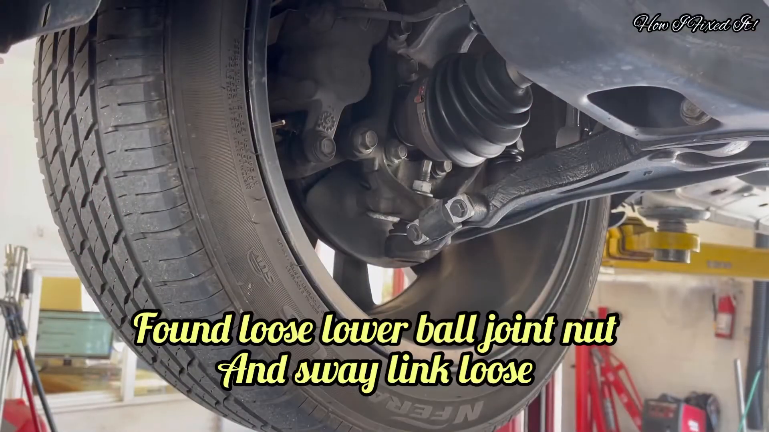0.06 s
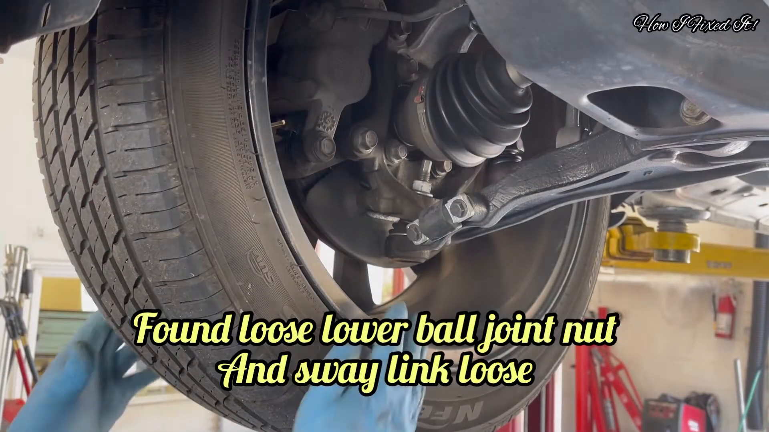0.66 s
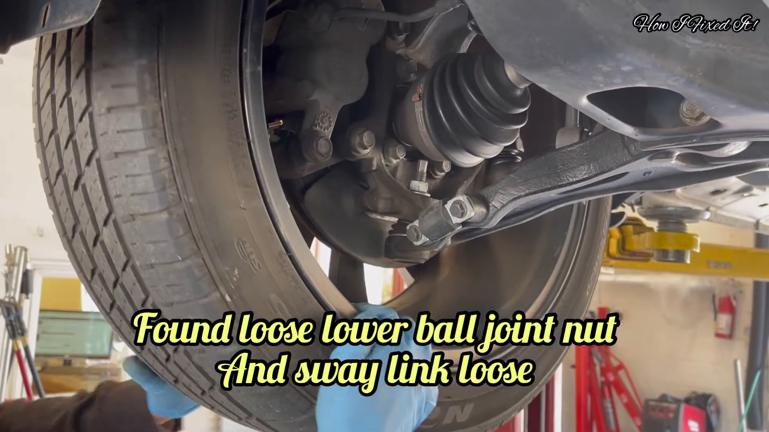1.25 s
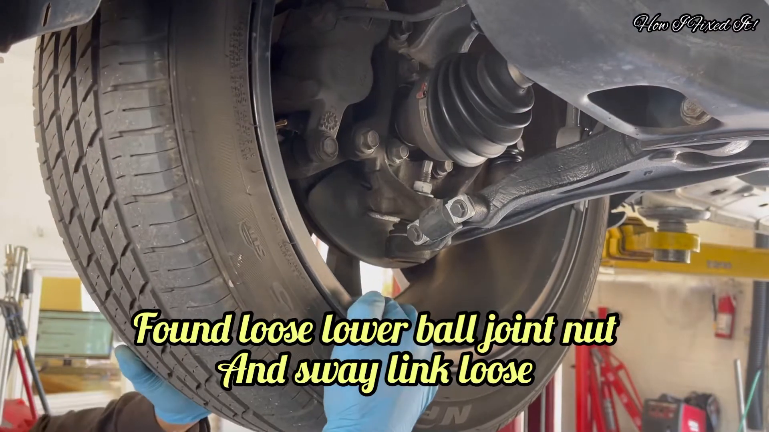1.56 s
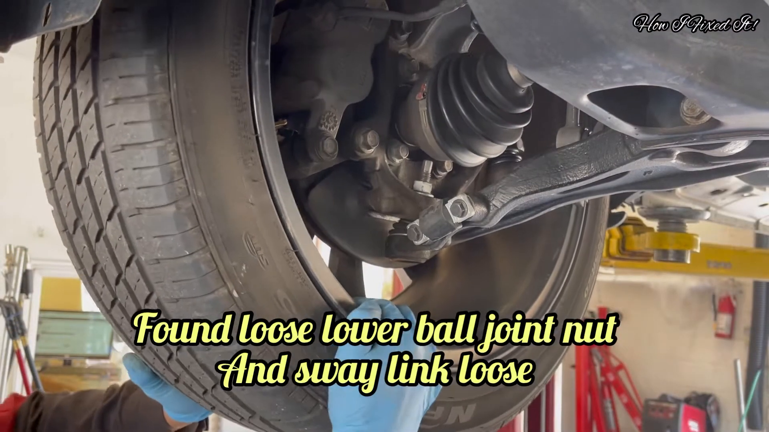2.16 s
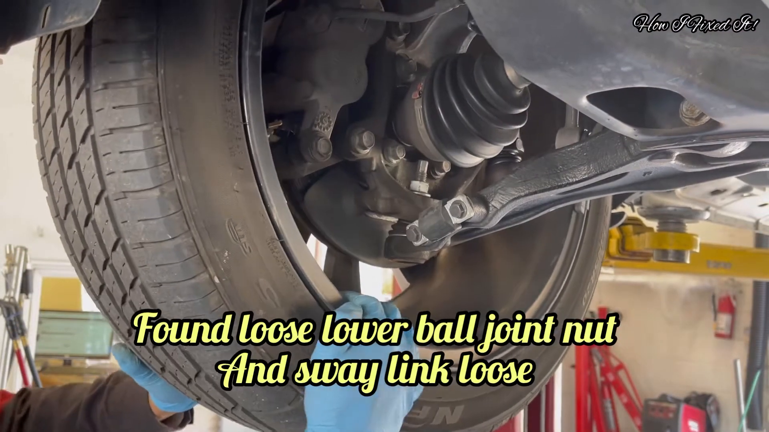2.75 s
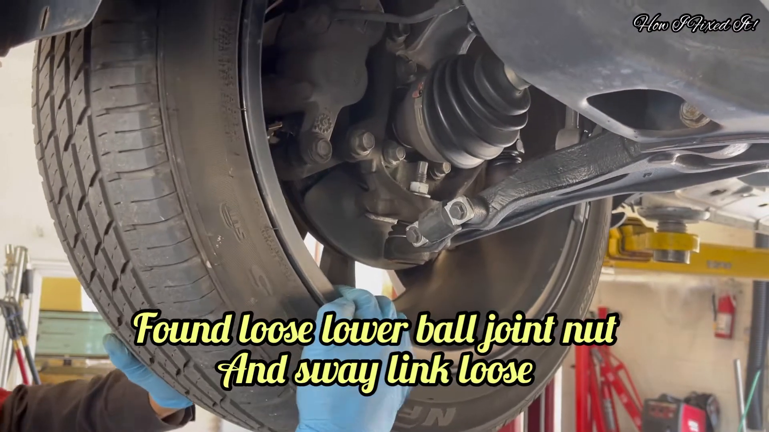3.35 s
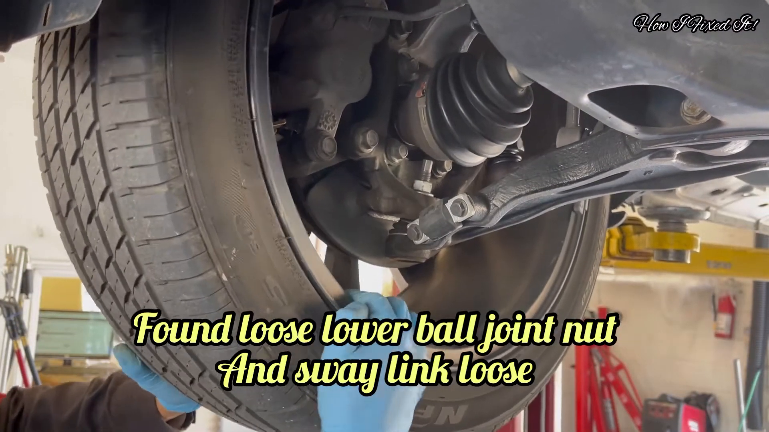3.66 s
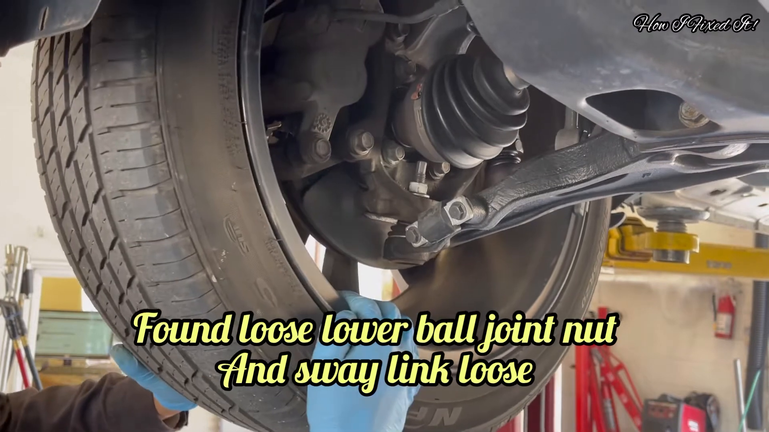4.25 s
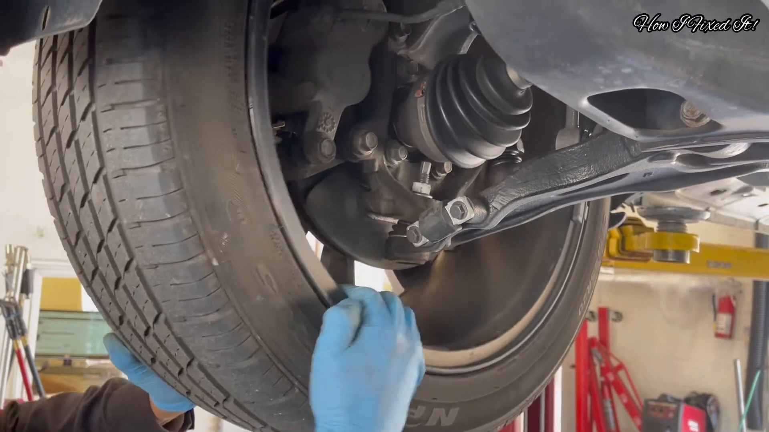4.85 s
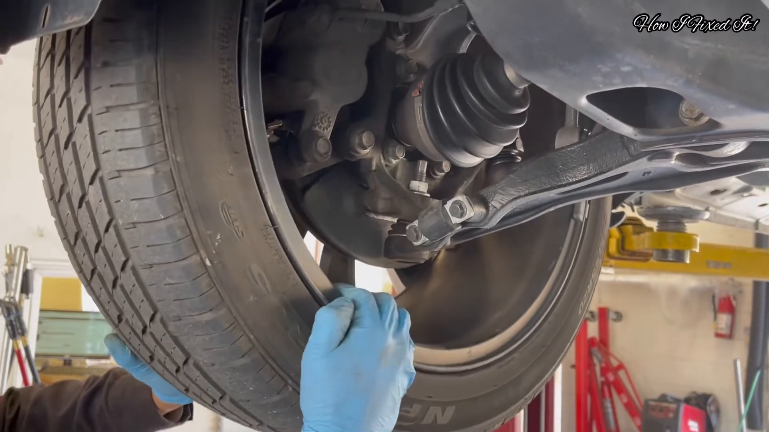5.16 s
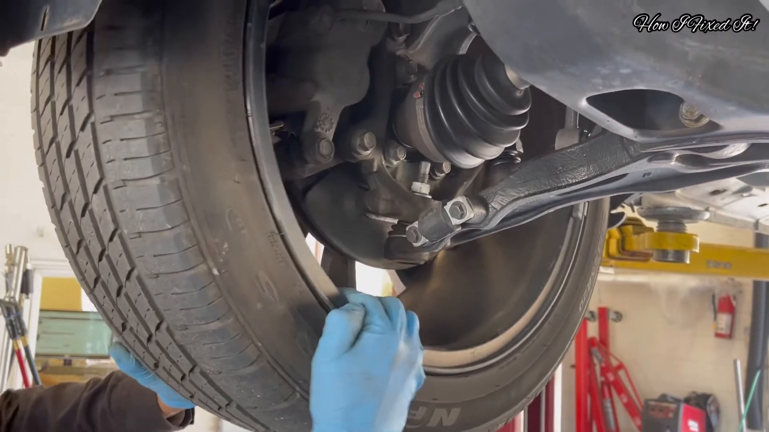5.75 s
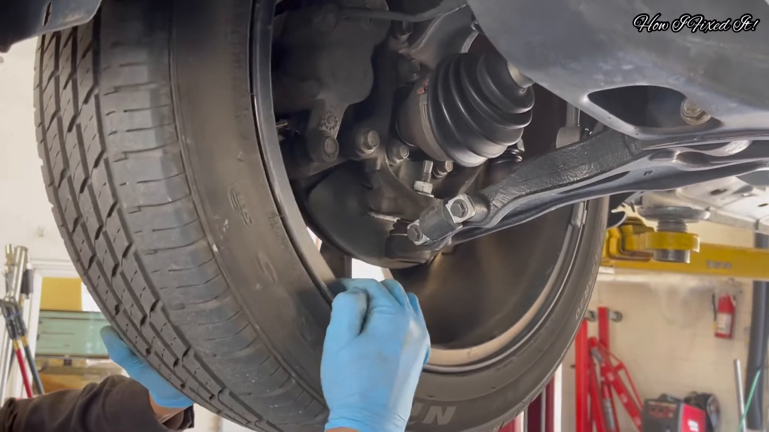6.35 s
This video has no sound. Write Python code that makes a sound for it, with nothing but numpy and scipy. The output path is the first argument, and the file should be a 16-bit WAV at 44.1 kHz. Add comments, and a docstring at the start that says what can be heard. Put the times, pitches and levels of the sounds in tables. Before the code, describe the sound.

A low workshop rumble runs throughout, with a distant engine droning at a slightly wandering pitch, swelling and fading. In the first 0.7 seconds there are a few faint, thin, high squeaks. Gloves slide softly over a car tyre, with a brief swish around 0.7 seconds and lighter brushing until about 1.6. At about 1.7 seconds the wheel starts being rocked, and a loose ball joint knocks close to the microphone: short, thudding clunks with a slight metallic ring, coming in uneven clusters, several a second. From 2.4 to 5.3 seconds a loose suspension link adds sharper clacks with a brief bright ping, roughly every half second, slightly to the left. Soft glove rubbing, light ticks and a low wheel rumble accompany the rocking, with another small swish near 3.5 seconds. The knocking continues until the end, at about 6.4 seconds.

```python
"""Rocking a loose front wheel

A car is up on a workshop lift, and gloved hands rock a front wheel back and forth. The gloves rub,
slide and tick on the tyre, with a few faint squeaks early on. The loose ball joint knocks in the
steering knuckle and the loose sway link clicks against its bracket. Behind them an engine drones
at a slowly wandering speed over the rumble of the shop."""
import sys
import numpy as np
from scipy import signal
from scipy.fft import rfft, irfft, next_fast_len
from scipy.io import wavfile

SR = 44100
rng = np.random.default_rng(int(sys.argv[2]) if len(sys.argv) > 2 else 0)


def generate_wav(signal):
    """Clip the signal to [-1, 1] and save it as 16-bit WAV at the path in sys.argv[1]."""
    frames = np.transpose(np.atleast_2d(signal))
    scaled = np.clip(frames, -1, 1) * 32767
    pcm = np.round(scaled).astype(np.int16)
    wavfile.write(sys.argv[1], SR, pcm)


N = 282681
BANDS_HZ = np.geomspace(25, 12800, 25)


def from_db(db):
    """Decibels to gain."""
    return 10 ** (np.asarray(db) / 20)


def automation(rows):
    """Draw each column of a timed table as a curve, one value a sample."""
    times, *columns = np.transpose(rows)
    return [np.interp(np.arange(N) / SR, times, column) for column in columns]


def at_hz(points, hz):
    """Read a spectrum on a log-frequency axis."""
    point_hz, values = np.transpose(points)
    return np.interp(np.log(hz), np.log(point_hz), values)


def drift(rate):
    """Random modulation with a spread of about 1, taking `rate` new values a second."""
    knots = rng.standard_normal(20000)
    return np.interp(np.arange(N) / SR * rate, np.arange(len(knots)), knots)


def swell(time, hold_s, db, rise_db_per_s, fall_db_per_s):
    """Envelope in dB that peaks at `time`, holds and fades."""
    t = np.arange(N) / SR
    return db - rise_db_per_s * np.maximum(time - t, 0) - fall_db_per_s * np.maximum(t - time - hold_s, 0)


def band_gains(spectrum):
    """Band EQ with this spectrum at unit power, rolling off 30 dB an octave past its ends."""
    octaves_outside = np.abs(np.log2(BANDS_HZ / np.clip(BANDS_HZ, spectrum[0][0], spectrum[-1][0])))
    gains = from_db(at_hz(spectrum, BANDS_HZ) - 30 * octaves_outside)
    widths = BANDS_HZ * np.log(BANDS_HZ[1] / BANDS_HZ[0])
    return gains / np.sqrt(np.sum(gains ** 2 * widths) * 4 / SR)


def stereo_noise(energy, image):
    """Play band energies on noise; the image's correlation sets each band's mid/side mix."""
    half_band = np.sqrt(BANDS_HZ[1] / BANDS_HZ[0])
    white = rng.standard_normal((2, 2, N))
    out = np.zeros((2, N))
    for k, hz in enumerate(BANDS_HZ):
        bandpass = signal.butter(2, [hz / half_band, hz * half_band], "band", fs=SR, output="sos")
        mid, side = signal.sosfilt(bandpass, white[k % 2])
        correlation = np.clip(at_hz(image, hz), -1, 1)
        band = np.sqrt(1 + correlation) * mid + np.sqrt(1 - correlation) * side * [[1], [-1]]
        out += np.sqrt(energy[k]) * band
    return out


def bed(spectrum, level_db, flutter_db, rate):
    """Band energies of a sustained noise whose level flutters."""
    envelope = from_db(level_db + flutter_db * drift(rate))
    return np.outer(band_gains(spectrum) ** 2, envelope ** 2)


def impulses(times, sizes, lengths_s):
    """One push per contact, spread over its length."""
    out = np.full(N + SR, 1e-18)
    for time, size, length_s in np.broadcast(times, sizes, lengths_s):
        start, count = max(round(time * SR), 0), max(round(length_s * SR), 1)
        out[start:start + count] += size / count
    return out[:N]


def decay(energy, t60):
    """Stored energy falls 60 dB in t60 seconds."""
    return signal.lfilter([1], [1, -np.exp(-np.log(1e6) / (t60 * SR))], energy)


def dense_modes(times, hit_db, spectrum, t60, damping, attack_s, room_db, room_t60, contact_s=0):
    """Band energies of many close modes: they build up, die sooner in the treble and leave a room tail."""
    out, smoothing = [], np.exp(-1 / (attack_s * SR))
    for hz, gain in zip(BANDS_HZ, band_gains(spectrum)):
        blows = impulses(times, (gain * from_db(hit_db(hz))) ** 2, contact_s)
        direct = decay(blows, t60 * (1000 / hz) ** damping)
        tail = from_db(room_db) ** 2 * decay(blows, room_t60)
        out.append(signal.lfilter([1 - smoothing], [1, -smoothing], direct + tail))
    return np.array(out)


def ringing(times, hit_db, modes, scatter_db, slack_rad, width_rad, left_lead_rad):
    """Each contact strikes every mode with its own strength; a slack contact scatters their phases."""
    out, age = np.zeros((2, N + SR)), np.arange(SR // 4) / SR
    hz, level_db, t60 = np.transpose(modes)
    strike_db = np.array([hit_db(f) for f in hz]).T + level_db
    attack = 1 - np.exp(-age / .001)
    rings = np.exp(np.outer(2j * np.pi * hz - np.log(1000) / t60, age)) * attack
    # each mode reaches left and right at its own phase
    turn = np.exp(.5j * (left_lead_rad + width_rad * rng.normal(size=len(hz))))
    for time, mode_db in zip(times, strike_db):
        strength, phase = rng.normal(size=(2, len(hz)))
        strike = from_db(mode_db + scatter_db * strength) * np.exp(1j * slack_rad * phase)
        start = max(round(time * SR), 0)
        out[:, start:start + len(age)] += (np.array([strike * turn, strike / turn]) @ rings).imag
    return out[:, :N]


def spectral_pan(x, balance):
    """Shift the left/right balance by frequency."""
    size = next_fast_len(N + SR // 10)
    hz = np.maximum(np.arange(size // 2 + 1) * SR / size, 1)
    gains = from_db(at_hz(balance, hz) * np.array([[.5], [-.5]]))
    return irfft(rfft(x, size) * gains, size)[:, :N]


# how hard the hands work the wheel, for rumble, rub and hiss: (time [s], level re steady rocking [dB])
EFFORT = [(0, -5.5), (1.62, -5.5), (2.1, -1), (2.6, 1), (3.1, 0.5), (3.4, 2), (4.1, -1.5), (4.6, -2),
          (5.2, 0.5), (6.41, 0.5)]
# low end of the rocking wheel: (frequency [Hz], density [dB])
WHEEL_RUMBLE = [(22, -16.5), (33, -7), (45, -6.5), (56, 10), (75, 8), (110, -11), (160, -3), (220, -30.5),
                (400, -42)]
# room tone of the shop: (frequency [Hz], density [dB])
ROOM_TONE = [(25, -6), (40, -6.5), (60, 5), (85, 17), (120, 19.5), (160, 14), (215, 4.5), (420, -9),
             (720, -5.5), (1300, -15), (2300, -24), (5000, -30), (8400, -33.5), (11500, -44)]
# stereo image of the shop and the hands: (frequency [Hz], correlation [-1..1])
SHOP_IMAGE = [(60, 1), (130, 0.79), (280, 0.78), (590, 0.087), (1260, 0.13), (2710, 0.43), (5800, 0.52),
              (8500, 0.94), (12000, 1)]
def workshop():
    """The rocking wheel rumbles over the steady air of the shop."""
    effort_db, = automation(EFFORT)
    rumble = bed(WHEEL_RUMBLE, -36 + 0.89 * effort_db, flutter_db=3, rate=10)
    air = bed(ROOM_TONE, -35, flutter_db=1.1, rate=3.65)
    return stereo_noise(rumble + air, SHOP_IMAGE)


# the engine's main note, following its speed: (time [s], pitch [Hz], level [dB])
ENGINE_NOTE = [(0, 124.6, -27), (0.8, 125.8, -36), (1.7, 123.4, -36.5), (2.3, 130.3, -36.5),
               (2.52, 131.4, -30), (2.75, 129.7, -25), (3.42, 127, -24.5), (3.68, 120.6, -33.5),
               (4.15, 122.2, -25.5), (4.52, 122.6, -27), (4.85, 121.6, -38.5), (5.25, 120.6, -27),
               (5.95, 121.1, -32.5), (6.41, 122.2, -37)]
# engine order an octave below that note: (time [s], level [dB])
HALF_ORDER = [(0, -43), (1.7, -41), (2.2, -36.5), (3.3, -34.5), (3.7, -44), (4.15, -43), (4.8, -35),
              (5.6, -40.5), (6.41, -61)]
# engine order at three quarters of its pitch: (time [s], level [dB])
THREE_QUARTER_ORDER = [(0, -31), (1.2, -39.5), (3.2, -40), (4.0, -58), (6.41, -55)]
# a second, weaker hum: (time [s], pitch [Hz], level [dB])
SIDE_HUM = [(0, 142.5, -79), (0.3, 139.7, -37), (1.5, 148.4, -38.5), (2.12, 148.9, -30), (2.45, 154, -56),
            (3.7, 159.9, -38), (4.6, 160.7, -38.5), (5.0, 159.8, -48)]
def engine():
    """Only the engine's low orders carry across the shop, wavering on the way; a hum sits beside them."""
    hz, main_db = automation(ENGINE_NOTE)
    half_db, = automation(HALF_ORDER)
    three_quarter_db, = automation(THREE_QUARTER_ORDER)
    hum_hz, hum_db = automation(SIDE_HUM)
    phase = 2 * np.pi * np.cumsum(hz) / SR
    waver_db, waver_rad = 1.3 * drift(rate=12), .3 * drift(rate=12)
    drone = from_db(main_db + waver_db) * np.sin(phase + waver_rad)
    drone += from_db(half_db) * np.sin(phase / 2 + 0.13 * drift(rate=11))
    drone += from_db(three_quarter_db) * np.sin(phase * 3 / 4)
    hum = from_db(hum_db) * np.sin(2 * np.pi * np.cumsum(hum_hz) / SR)
    return np.sqrt(2) * (drone + hum) * from_db([[.25], [-.25]])


# body of the gloves rubbing on the tyre: (frequency [Hz], density [dB])
RUB_TONE = [(110, -18), (180, -3), (246, 4), (269, -5.5), (377, -4.5), (515, -7), (579, -9), (626, -19.5),
            (750, -6), (4000, -33), (5200, -54.5), (8800, -120)]
# hiss on top of the rub: (frequency [Hz], density [dB])
HISS_TONE = [(1500, -10), (2500, -2.5), (2900, -13), (5500, -0.5), (7600, -23.5), (9500, -7.5),
             (11000, -17), (12000, -37)]
# light ticks of glove and rubber: (time [s], level [dB])
TICKS = [(0.283, -55.5), (1.983, -56), (2.033, -53), (2.199, -58), (2.937, -58), (5.859, -55.5),
         (6.225, -59.5)]
# colour of a tick: (frequency [Hz], density [dB])
TICK_TONE = [(1500, -22), (4000, 7), (6000, -2), (8300, 6.5), (10000, 1), (12000, -21)]
# a glove slides on the tread: (peak time [s], level [dB], swell [dB/s], fade [dB/s])
SLIDES = [(0.43, -68, 40, 60), (0.705, -53.5, 550, 200), (0.745, -50, 400, 190), (0.905, -62, 150, 150),
          (1.26, -63.5, 38, 100), (1.56, -62, 80, 48), (3.425, -55.5, 92, 220), (3.548, -58, 450, 165)]
# bright swish of a slide: (frequency [Hz], density [dB])
SLIDE_TONE = [(2500, -2), (4500, 0), (7000, -4), (9000, -0.5), (11300, 10.5), (12600, -9.5)]
def hands():
    """Gloves tick, rub and slide on the tyre; the rub and its hiss ride the effort."""
    effort_db, = automation(EFFORT)
    tick_times, tick_db = np.transpose(TICKS)
    ticks = dense_modes(tick_times, lambda hz: tick_db + 7, TICK_TONE, t60=0.06, damping=0.068,
                        attack_s=0.0015, room_db=-12.5, room_t60=0.36)
    rub = bed(RUB_TONE, -40 + effort_db, flutter_db=1.3, rate=37)
    hiss = bed(HISS_TONE, -63.5 + 0.99 * effort_db, flutter_db=3.5, rate=42)
    slide_db = np.max([swell(time, 0, db, rise, fall) for time, db, rise, fall in SLIDES], axis=0)
    slides = bed(SLIDE_TONE, slide_db, flutter_db=1.2, rate=190)
    return stereo_noise(ticks + rub + hiss + slides, SHOP_IMAGE)


# faint, high squeaks: (time [s], hold [s], level [dB], flutter [dB])
SQUEAKS = [(0, .04, -68, -2), (.233, 0.013, -63, -2), (.318, .035, -61, 3), (0.365, 0.015, -58, 3.5),
           (0.547, 0.14, -67, 5.5), (0.574, 0.046, -61.5, 6.5)]
def squeaks():
    """A thin whistle in short bursts, smooth at first, then stuttering."""
    pitch_hz, wobble_hz, fade_db_per_s = 5600, 45, 500
    flutter = drift(rate=128.4)
    bursts_db = [swell(time, hold_s, db, fade_db_per_s, fade_db_per_s) + flutter_db * flutter
                 for time, hold_s, db, flutter_db in SQUEAKS]
    envelope = from_db(np.max(bursts_db, axis=0))
    phase = 2 * np.pi * np.cumsum(pitch_hz + wobble_hz * drift(rate=300)) / SR
    return np.sqrt(2) * envelope * np.sin(phase + np.array([[.3], [-.3]]))


# ball joint hits; thud, clank, crack and snap are trims on the level:
# (time [s], level [dB], thud [dB], clank [dB], crack [dB], snap [dB], contact length [s])
KNOCKS = [(1.7238, -34, -4.5, -15, -38, 10, 0.00207), (1.765, -24, -2, -4, -28.5, 3, 0.0021),
          (1.904, -39, 4.5, -4, -28, -2, 0.0025), (1.937, -36.5, -0.5, -2, -19.5, 4, 0.0065),
          (1.963, -28.5, 0, -10.5, -33, 6, .002), (1.972, -30, 0.5, -10, -37, 6, 0.0039),
          (2.003, -40, 2, -8, -25, 2, 0.0041), (2.233, -31, 2, -7, -33.5, 3, 0.00406),
          (2.438, -27.5, 1.5, -7, -29.5, -0.5, 0.0019), (2.842, -21.5, -13.5, -17.5, -43, -2, .002),
          (2.91, -29.5, 2, -13, -29, -5, 0.0063), (3.316, -19.5, -13.5, -10.5, -49, -2, 0.00199),
          (3.384, -36, 6.5, -10, -19, -10, 0.007), (3.779, -26.5, -9.5, -13.5, -49, -6, 0.00297),
          (3.87, -26, -2.5, -10, -39, -4, 0.0028), (4.153, -35, -0.5, -12.5, -37, 7.5, 0.0022),
          (4.27, -27.5, -10, -15, -48, 0.5, 0.00198), (4.324, -39.5, -2, -8, -28, -2, .003),
          (4.35, -29, 1, -12.5, -35, -3, 0.00391), (4.625, -32.5, 3, -9, -37, 3.5, 0.0029),
          (4.746, -34, -5, -11, -51, 3, 0.0028), (4.801, -40, -2, -6, -26, -2, 0.0024),
          (4.833, -26.5, -0.5, -8, -33.5, 1, 0.0056), (5.03, -27.5, -16, -19.5, -43, 4.5, .002),
          (5.076, -27, -4.5, -7, -33, 0, 0.0031), (5.144, -30.5, -4.5, -3, -38, 2, 0.003946),
          (5.224, -33.5, 1, -5, -29, 0, 0.0044), (5.476, -34, 2, -8, -35, -8, 0.0098),
          (5.542, -40, 3, -18, -42, -8, 0.0061), (5.715, -27.5, -10, -17.5, -39, 2, 0.0028),
          (5.819, -30, -9, -14, -51, 4.5, 0.0028), (5.9, -32.5, 4, -7.5, -37, -5, 0.0062),
          (5.918, -39, -1, -17, -27, 4, 0.0052), (6.073, -25, -6.5, -6.5, -23.5, 5, 0.0018),
          (6.108, -34, 2.5, -11, -42, 4, 0.0045), (6.175, -29.5, -11, -9, -45, -9, .011),
          (6.265, -35, 1.5, -7.5, -39, -1, .007)]
# dense, short-lived modes of a knock: (frequency [Hz], density [dB])
KNOCK_TONE = [(130, 8.5), (240, 0), (380, 6.5), (560, -9), (900, -6.5), (1400, -8), (2000, -10),
              (2600, -15), (3500, -3.5), (5500, -6.5), (8500, -7), (12000, -25.5)]
# ring of knuckle, control arm and rim: (frequency [Hz], level [dB], t60 [s])
KNUCKLE_MODES = [(202.6, -2, 0.21), (242, -4.5, 0.13), (302.5, -2.5, 0.14), (341.3, -1.5, 0.14),
                 (395, -8.5, 0.091), (459.6, -2.5, 0.2), (780, -10.5, 0.14), (1004, -8.5, 0.081),
                 (1055, -10.5, 0.068), (1153, -10, 0.3), (1320, -14.5, 0.36), (1430, -17.5, 0.21),
                 (1509, -2, 0.092), (1595, -8, 0.28), (1716, -11, 0.37), (1975, -7, 0.2),
                 (2090, -12.5, 0.18), (2169, -9, .17), (2210, -9, 0.21), (2530, -8, 0.11), (2700, -5, 0.1),
                 (3140, -6, 0.19), (3150, -2.5, .14), (3420, -6, 0.092), (3620, -2.5, 0.13),
                 (4620, -4, 0.17), (4720, 0.5, 0.17), (5850, 3, 0.12)]
# panning of the knocks: (frequency [Hz], left minus right [dB])
KNOCK_PAN = [(120, 3.5), (320, -2.5), (700, 2), (1700, 0.5), (3000, 3), (8000, 1.5)]
# stereo image of the knocks and clicks: (frequency [Hz], correlation [-1..1])
SUSPENSION_IMAGE = [(130, 0.84), (330, 1), (700, 0.34), (1700, 0.42), (3000, 0.23), (6000, 0.85),
                    (8500, 0.68), (12000, .85)]
def ball_joint():
    """The stud snaps across its play, then the knuckle, arm and wheel take up the blow and ring."""
    times, level_db, thud_db, clank_db, crack_db, snap_db, contact_s = np.transpose(KNOCKS)
    hit_eqs = [[(330, thud), (850, 0), (1900, clank), (4500, crack)]
               for thud, clank, crack in zip(thud_db, clank_db, crack_db)]
    hit_db = lambda hz: level_db + np.array([at_hz(eq, hz) for eq in hit_eqs])
    # the heavy low modes are slow to start and take little part in the snap
    transient_db = lambda hz: hit_db(hz) + snap_db + np.interp(hz, [400, 850], [-8, 4])
    snap = dense_modes(times, transient_db, KNOCK_TONE, t60=.028, damping=0.16,
                       attack_s=.0008, room_db=-36, room_t60=.3, contact_s=contact_s)
    body = dense_modes(times, hit_db, KNOCK_TONE, t60=0.073, damping=0.3,
                       attack_s=0.0097, room_db=-10, room_t60=0.34, contact_s=contact_s)
    ring = ringing(times + contact_s / 2, hit_db, KNUCKLE_MODES,
                   scatter_db=2.8, slack_rad=1.93, width_rad=1, left_lead_rad=-0.1)
    knocks = from_db(8) * stereo_noise(snap + body, SUSPENSION_IMAGE) + from_db(-2) * ring
    return spectral_pan(knocks, KNOCK_PAN)


# sway link hits; treble and ping are trims on the level: (time [s], level [dB], treble [dB], ping [dB])
CLICKS = [(2.4027, -29.5, -34, 8), (2.88, -39.5, -18.5, -11), (2.9552, -37.5, -27, 0),
          (3.436, -26, -24.5, 3), (3.9216, -27.5, -24.5, 1), (4.3984, -45, -28, 14), (4.8782, -35, -32, 4),
          (5.2755, -24.5, -21, 3)]
# dense, short-lived modes of a click: (frequency [Hz], density [dB])
CLICK_TONE = [(700, -10.5), (1700, -7), (2300, -8), (3000, -3), (3600, -8.5), (4500, -5.5), (5700, 2.5),
              (7200, 8), (9500, 1), (12000, -15)]
# ring of the link: (frequency [Hz], level [dB], t60 [s])
LINK_MODES = [(1630, -21.5, 0.11), (1700, -20, 0.34), (2096, -23.5, 0.28), (2660, -5.5, 0.15),
              (2900, -10, 0.083), (3000, -0.5, 0.041), (3070, -13, 0.23), (3133, -2.5, 0.14),
              (3200, -4.5, 0.071), (3570, -15, 0.072), (3870, -11, 0.095), (4420, -11, 0.075),
              (4560, -12.5, 0.085), (6556, -9, 0.062), (7100, 8, 0.078), (7500, -2, 0.059)]
def sway_link():
    """The loose link snaps against its bracket: a dull clack and a short bright ring of beating modes."""
    times, level_db, treble_db, ping_db = np.transpose(CLICKS)
    clack_db = lambda hz: np.interp(hz, [2000, 2700], [8.5, 0])
    hit_db = lambda hz: level_db + treble_db * np.interp(hz, [4300, 6000], [0, 1]) + clack_db(hz)
    ping_hz, ping_width_hz = 2900, 49   # this mode's strength depends on where the link strikes
    mode_db = lambda hz: hit_db(hz) + ping_db * np.exp(-((hz - ping_hz) / ping_width_hz) ** 2)
    body = dense_modes(times, hit_db, CLICK_TONE, t60=0.17, damping=0.4,
                       attack_s=0.0005, room_db=-12, room_t60=0.49)
    ring = ringing(times, mode_db, LINK_MODES,
                   scatter_db=2, slack_rad=0.7, width_rad=0.25, left_lead_rad=1)
    clicks = from_db(-2) * stereo_noise(body, SUSPENSION_IMAGE) + from_db(-6) * ring
    return clicks * from_db([[1.6], [-1.6]])   # a little left of centre


def scene():
    """Suspension and hands up front, shop and engine behind."""
    return ball_joint() + sway_link() + hands() + squeaks() + workshop() + engine()


def record(dry):
    """The left microphone port turns the phase around its resonance; a steep low-pass trims the top."""
    port_hz, port_width_hz, cutoff_hz = 10090, 1840, 11750
    radius, angle = np.exp(-np.pi * port_width_hz / SR), 2 * np.pi * port_hz / SR
    poles = np.array([1, -2 * radius * np.cos(angle), radius ** 2])
    left = signal.lfilter(poles[::-1], poles, dry[0])   # all-pass
    lowpass = signal.ellip(10, .2, 80, cutoff_hz, fs=SR, output="sos")
    return signal.sosfilt(lowpass, np.array([left, dry[1]]))


dry = scene()
out = record(dry)
generate_wav(out)
```